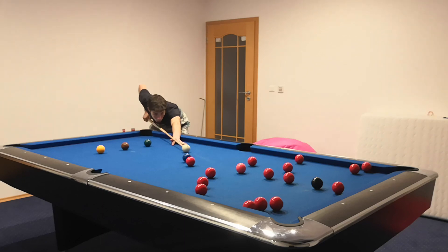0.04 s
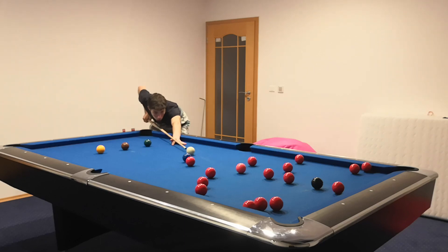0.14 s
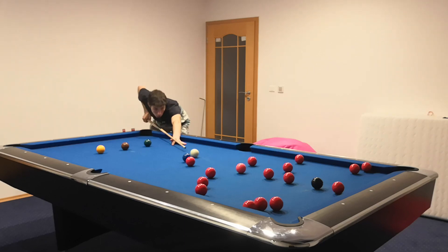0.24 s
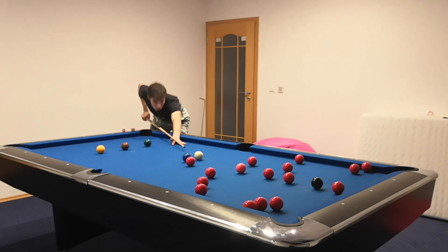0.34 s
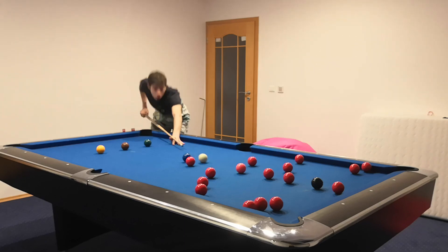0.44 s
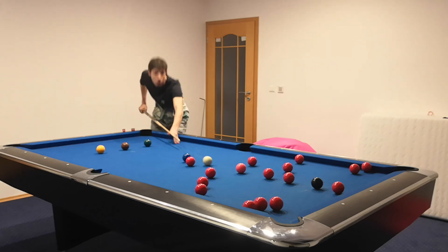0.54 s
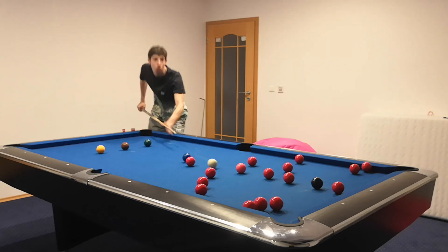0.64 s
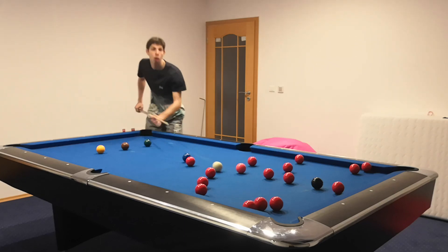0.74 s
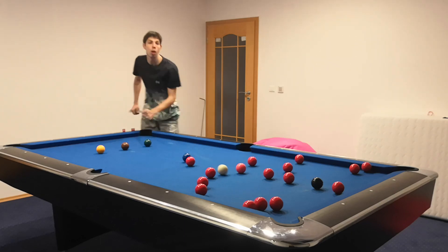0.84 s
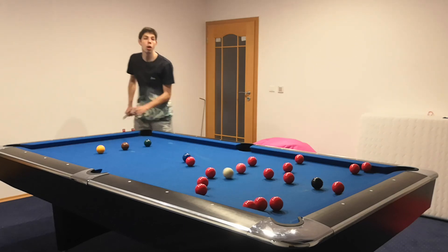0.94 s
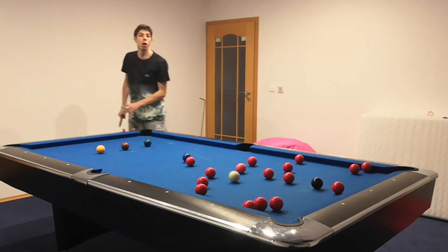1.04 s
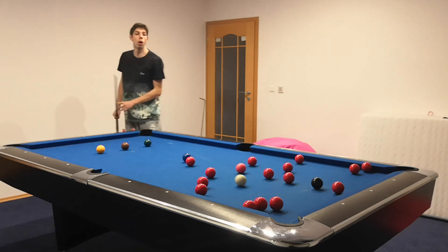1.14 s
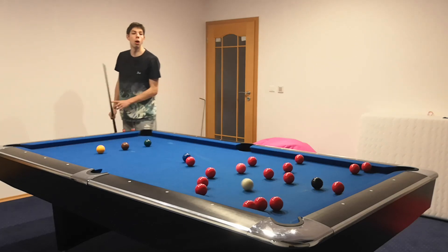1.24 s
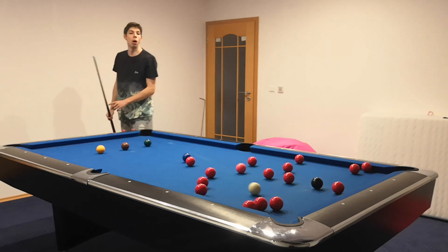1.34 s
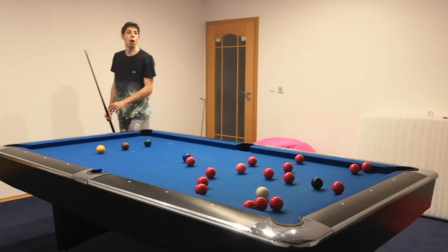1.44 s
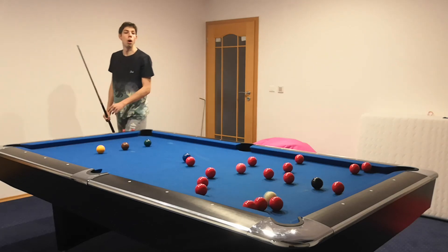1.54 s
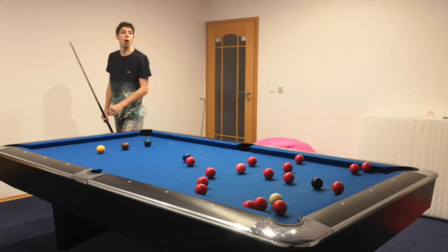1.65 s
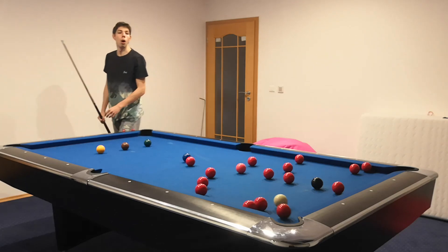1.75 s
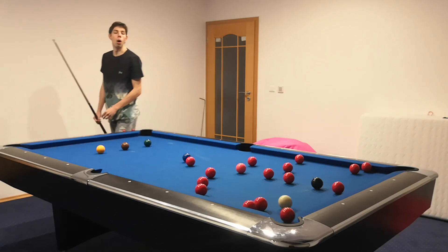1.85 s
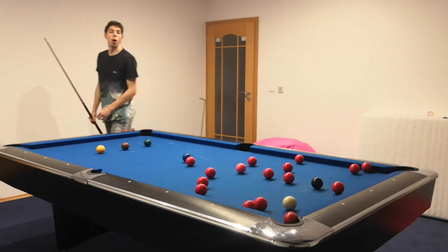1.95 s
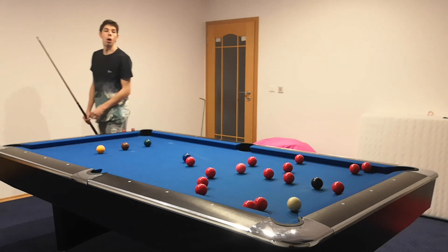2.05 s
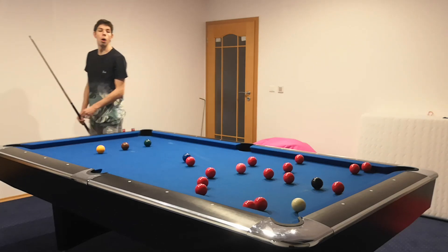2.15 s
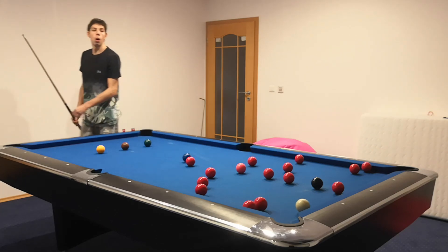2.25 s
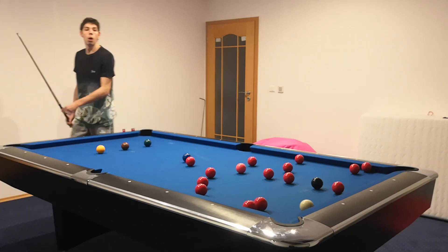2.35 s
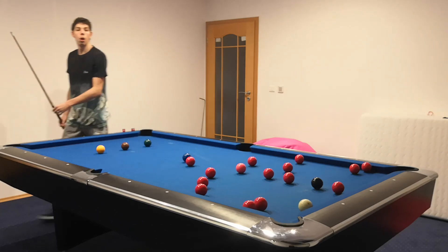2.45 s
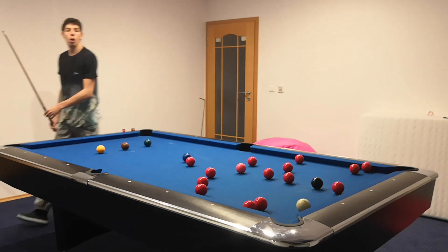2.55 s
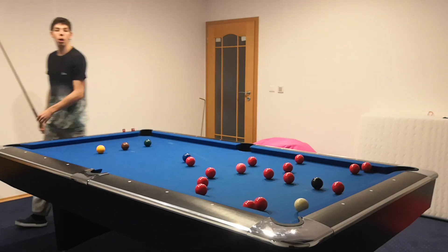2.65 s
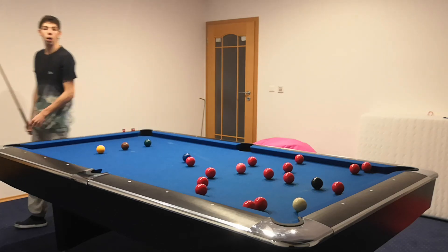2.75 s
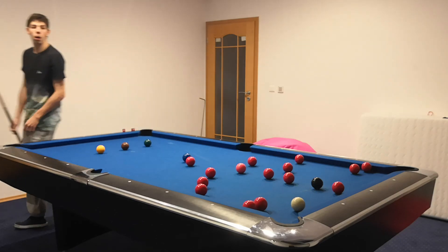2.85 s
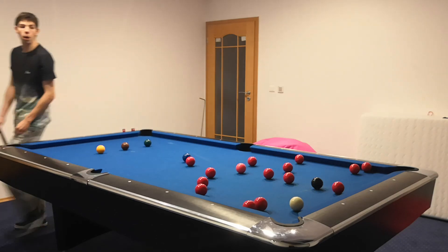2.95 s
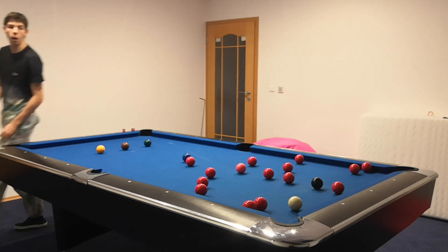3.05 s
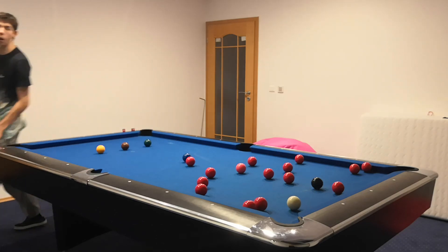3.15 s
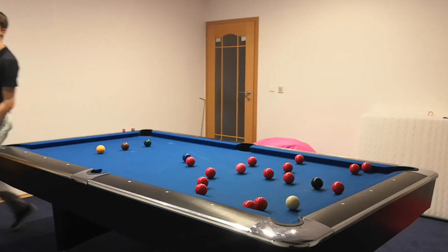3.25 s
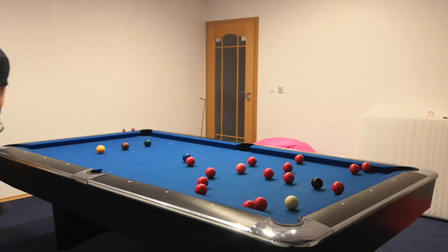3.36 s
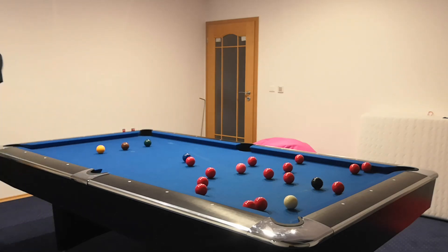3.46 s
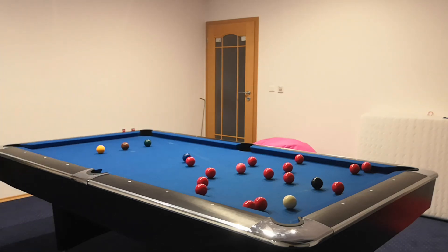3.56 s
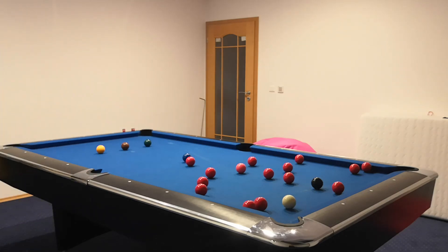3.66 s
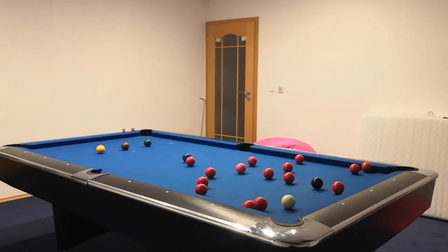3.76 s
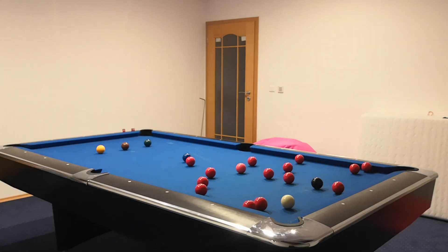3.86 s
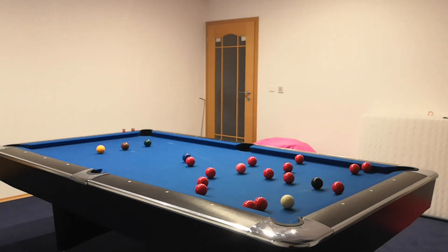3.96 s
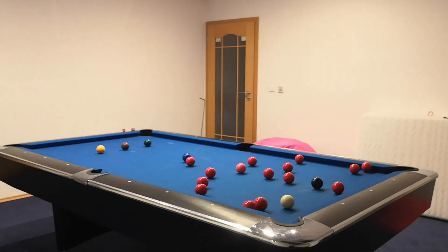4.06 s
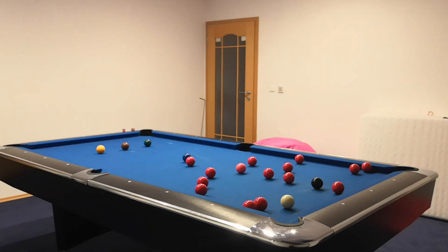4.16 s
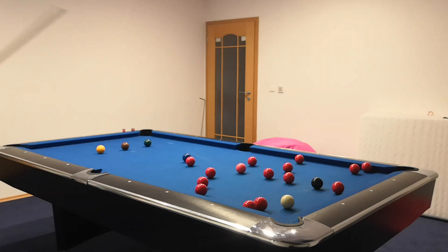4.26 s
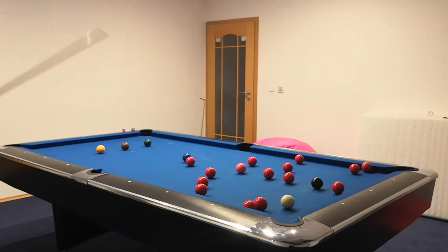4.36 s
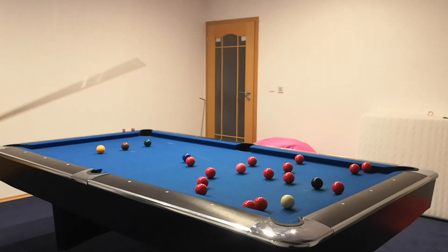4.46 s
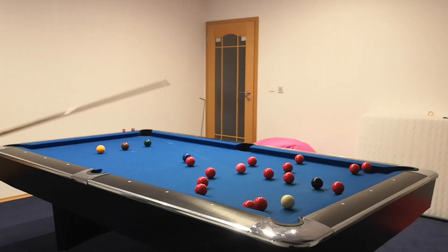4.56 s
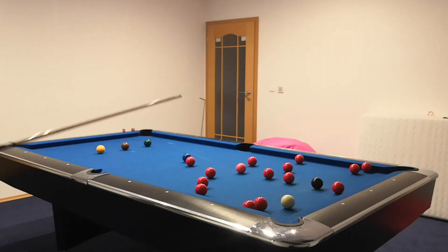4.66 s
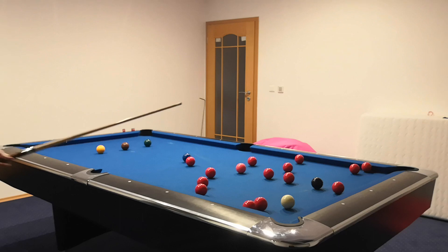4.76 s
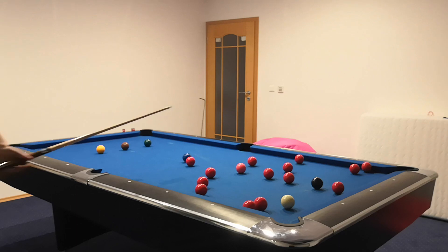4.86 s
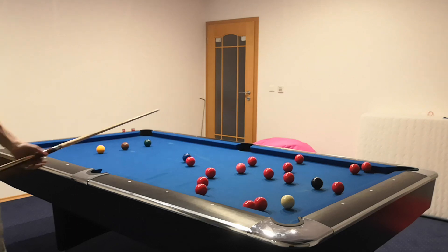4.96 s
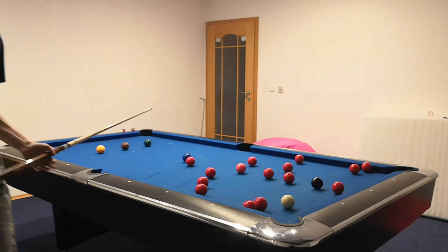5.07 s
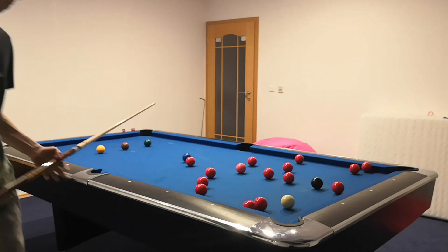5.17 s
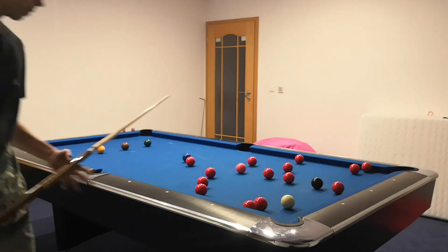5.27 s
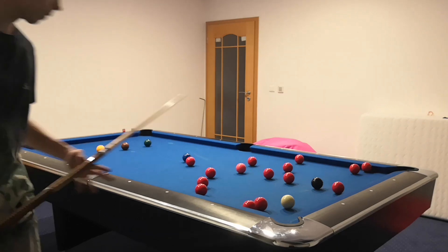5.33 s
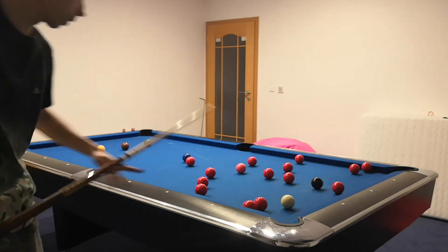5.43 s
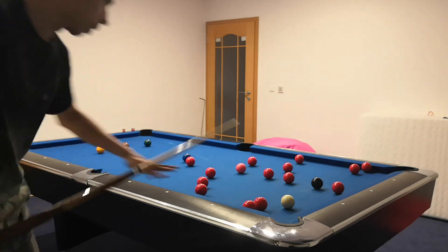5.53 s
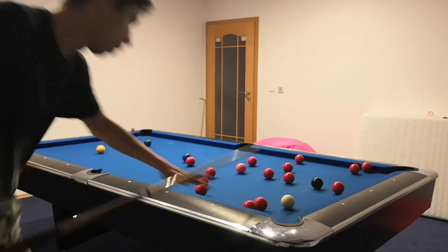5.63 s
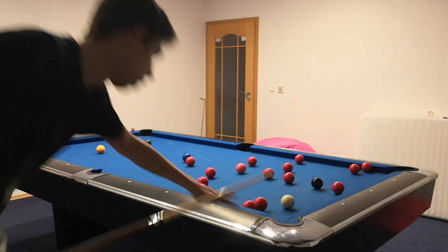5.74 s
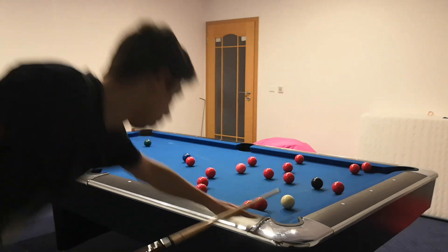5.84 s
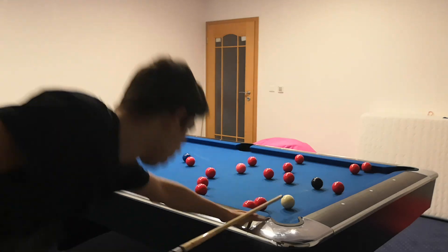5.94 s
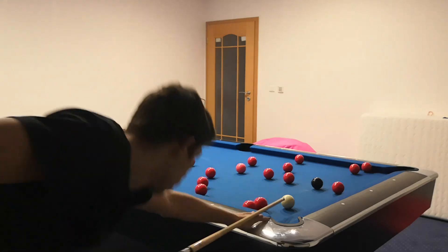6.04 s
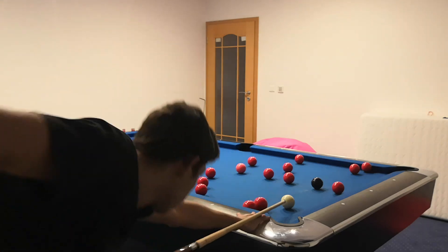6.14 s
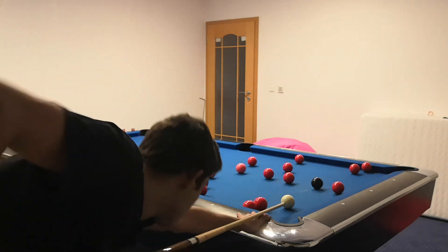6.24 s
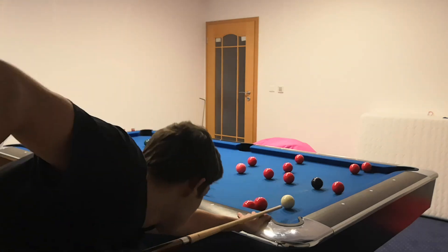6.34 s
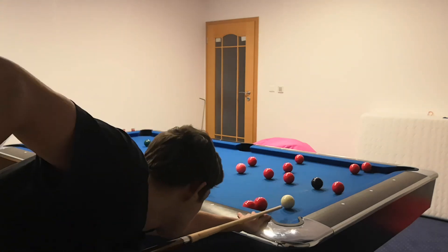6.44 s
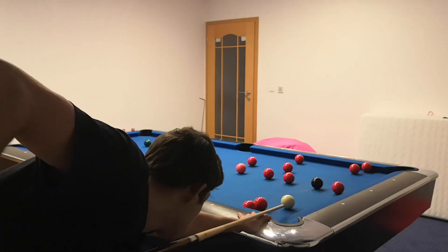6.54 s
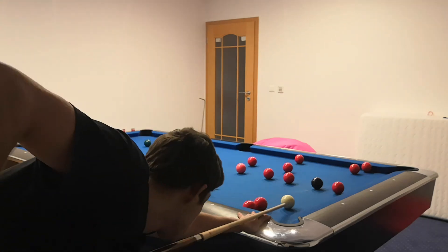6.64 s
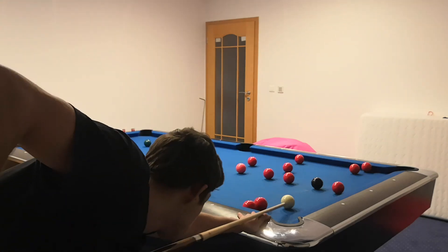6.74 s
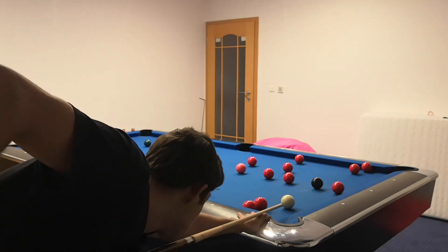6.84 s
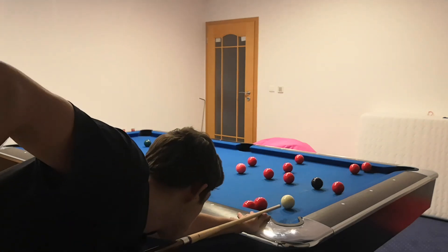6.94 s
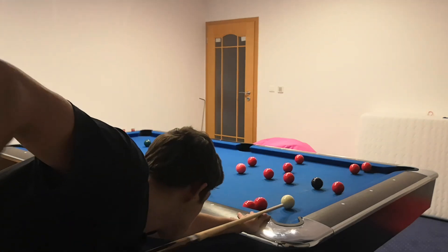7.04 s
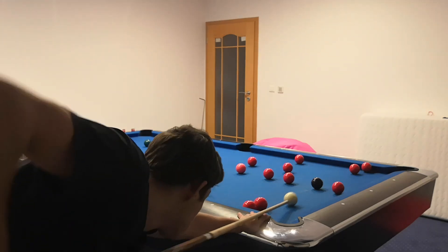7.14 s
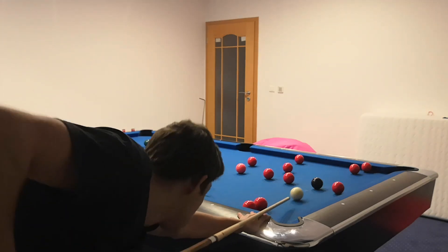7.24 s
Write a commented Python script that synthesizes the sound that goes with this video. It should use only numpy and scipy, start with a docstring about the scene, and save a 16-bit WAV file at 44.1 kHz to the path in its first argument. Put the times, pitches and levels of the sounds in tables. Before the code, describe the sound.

A cue tip clicks a ball, two balls crack loudly, one clatters into the pocket and rumbles away; soft footsteps, then another cue hit.

```python
"""A cue strikes and a ball rolls over the slate; two balls crack together, one knocks into the pocket and runs
down the return channel. The player walks round, shoes scuffing and clothes rustling; the cue strikes again at the end.
Contacts are coloured clicks with ringing modes; rolling, clothes and floor are filtered noise under level curves.
A small bare room adds echoes and a tail; a spaced microphone pair with a noise suppressor hears it."""
import sys
import numpy as np
from scipy import signal
from scipy.fft import rfft, irfft
from scipy.io import wavfile
from scipy.ndimage import uniform_filter1d

SR = 44100
rng = np.random.default_rng(int(sys.argv[2]) if len(sys.argv) > 2 else 0)


def generate_wav(signal):
    """Clip the signal to [-1, 1] and save it as 16-bit WAV at the path in sys.argv[1]."""
    frames = np.transpose(np.atleast_2d(signal))
    scaled = np.clip(frames, -1, 1) * 32767
    pcm = np.round(scaled).astype(np.int16)
    wavfile.write(sys.argv[1], SR, pcm)


N = 321930

# Source levels are relative: scene() applies the mix gains. pan_db is left minus right.
# ball against pocket and channel: time_s, body_db, thud_db, tick_db, pan_db, snap_hz, snap_width_per_hz, plate_db
POCKET_KNOCKS = [(2.056, -46, -77.5, -66, 3.5, 1200, 1, -89), (2.08, -37, -59, -39, -2.5, 2600, 1, -61),
                 (2.256, -18.5, -64, -56, -7.5, 1370, 1.61, -61),
                 (2.281, -28.5, -36, -21, -1.5, 830, 0.88, -38),
                 (2.516, -17.5, -64, -24, -1.5, 1185, 0.63, -66.5),
                 (2.57, -31, -39, -32.5, -3.5, 590, 0.35, -59.5),
                 (2.677, -24.5, -53.5, -65, -1, 1190, 1.5, -62),
                 (2.706, -37.5, -42, -63, -14, 832, 2.8, -39), (2.721, -47, -50, -29.5, -7, 510, 0.43, -60)]
# feet land: start_s, slate_db, floor_heave_db, heave_hold_s
FOOT_LANDINGS = [(.86, -74, -61, 0.041), (3.2, -73.5, -63.5, 0.13), (3.769, -56, -57, 0.099),
                 (4.29, -58, -58.5, 0.1), (4.8, -59, -54.5, 0.038), (5.3, -61, -58, 0.058),
                 (5.78, -54, -64.5, .15)]
SCUFF_DECAY_S = .0015   # grit behind a shoe or cue contact
BURST_SAMPLES = 2048   # longest contact


def cue_strikes():
    """The tip hits the ball and the shaft rings."""
    # tip on ball: time_s, body_db, thud_db, tick_db, pan_db, snap_hz, snap_width_per_hz
    tip_hits = [(.105, -32.5, -38.5, -75, 1, 643, 1.68), (.116, -40, -68, -51, -13, 2000, 1.8),
                (7.2045, -46, -81, -72, 18, 700, 2.6), (7.208, -29, -61, -76, -5.5, 900, 2.6),
                (7.212, -37, -36.5, -36, 0, 515, 1.24)]
    # cue shaft: mode_hz, level_db, t60_s
    shaft_modes = [(730, 2.5, 0.042), (1060, 9, 0.018), (1630, -4, 0.15), (2047, 0.5, 0.077),
                   (2687, -1.5, 0.23)]
    return blows(tip_hits, shaft_modes, ring_db=-24, thud_hz=264, grit_decay_s=SCUFF_DECAY_S)


def crack():
    """Hard spheres barely ring: one short minimum-phase pulse, its energy as early as its colour allows."""
    # ball on ball: time_s, level_db, pan_db
    collisions = [(1.6736, -7.5, -1.5)]
    # pulse spectrum: freq_hz, level_db_per_hz
    colour = [(120, -40), (200, -11), (244, -32.5), (277, -19), (659, -22.5), (980, -7.5), (1410, -2),
              (2290, 1), (2900, -5), (3870, -23), (4160, -39), (5260, -32), (6420, -42), (15000, -53)]
    half = BURST_SAMPLES // 2
    hz = np.fft.rfftfreq(BURST_SAMPLES, 1 / SR)
    cepstrum = irfft(np.log(amp(at_hz(colour, hz))))
    cepstrum[1:half] *= 2   # folding the cepstrum gives minimum phase
    cepstrum[half + 1:] = 0
    pulse = irfft(np.exp(rfft(cepstrum)))
    time_s, level_db, pan_db = np.transpose(collisions)
    return signal.fftconvolve(clicks(time_s, level_db, pan_db), pulse[None] / np.abs(pulse).max())[:, :N]


def pocket():
    """The ball knocks the wooden frame, which rings."""
    # table frame: mode_hz, level_db, t60_s
    frame_modes = [(316, -30, 0.018), (487, 0.5, 0.1), (629.5, 4, 0.033), (1033, 4, 0.04),
                   (1178, -3.5, 0.069), (1266, 0.5, 0.068), (1945, 3, 0.019), (2765, -11, 0.075)]
    return blows(POCKET_KNOCKS, frame_modes, ring_db=-18, thud_hz=79, grit_decay_s=.0032)


def plate():
    """Each knock jars the metal plate of the pocket, which rings."""
    # metal pocket plate: mode_hz, level_db, t60_s
    metal_modes = [(8500, -4, .05), (9200, -14, .03), (3850, -3, .03)]
    time_s, *_, plate_db = np.transpose(POCKET_KNOCKS)
    return ringing(time_s, plate_db, 0 * time_s, metal_modes)


def hollow_knocks():
    """Soft taps on hollow wood: only a short round ring is heard."""
    # time_s, level_db, centre_hz
    taps = [(2.064, -43.5, 540), (2.115, -56, 580), (3.488, -50.5, 404), (3.526, -61.5, 420),
            (3.729, -57.5, 418), (3.825, -64.5, 420)]
    time_s, level_db, hz = np.transpose(taps)
    return bursts(time_s, level_db, 0, hz, 0.2, grit_decay_s=.0014)


def rolling():
    """Rolling noise, blows and feet excite the low resonances of the slate; drone and channel join in."""
    # slate resonances: centre_hz, width_hz, level_db
    slate_modes = [(82, 27.2, 0.5), (119, 20, -6), (149, 11, -12.5), (213, 3, -16)]
    white = stereo_noise([(20, -1), (300, -4.5), (2000, -59.5)])
    slate = 0
    for hz, width_hz, level_db in slate_modes:
        slate = slate + amp(level_db) * resonance(resonance(white, hz, width_hz), hz, 4.6 * width_hz)
    return slate_gain() * rms_one(slate) + cue_ball_drone(white) + channel_rattle()


def slate_gain():
    """Gain of the slate: the powers of rolling, jolts, feet and channel add."""
    # balls rolling on the cloth: time_s, level_db
    roll_curve = [(0.0, -58), (0.36, -60), (0.55, -66), (1.6, -67), (2.0, -66), (3.1, -68.5), (6.1, -77),
                  (7.3, -70)]
    # blows that shake the slate: start_s, level_db
    jolt_rows = [(.105, -48), (1.674, -47.5), (2.1, -58), (2.256, -33.5), (7.208, -42.5)]
    jolts = swells(*np.transpose(jolt_rows), rise_s=.1, hold_s=0, fall_db_per_s=109)
    start_s, slate_db, *_ = np.transpose(FOOT_LANDINGS)
    feet = swells(start_s, slate_db, rise_s=.031, hold_s=.052, fall_db_per_s=91)
    roll = amp(in_time(roll_curve)[0])
    return np.sqrt(roll ** 2 + jolts ** 2 + feet ** 2 + channel_gain(column=1) ** 2)


def cue_ball_drone(white):
    """The cue ball rolls the length of the slate: noise through a narrow 85 Hz resonance."""
    # time_s, level_db
    drone_curve = [(.3, -81), (.56, -81), (.66, -57), (1.1, -57), (1.3, -59), (1.6, -64.5), (1.7, -70)]
    hum = resonance(resonance(white, 85, 6), 85, 14)
    return amp(once(drone_curve)[0]) * rms_one(hum)


def channel_rattle():
    """The ball runs roughly down the return channel: coloured noise with a flickering level."""
    # freq_hz, level_db_per_hz
    colour = [(88, -41), (150, -15), (381, -3), (462, -0.5), (769, -8), (1090, -1.5), (1350, -6),
              (4870, -22), (6330, -32), (8690, -30), (10000, -35), (13000, -73), (22000, -120)]
    return channel_gain(column=3) * flicker(40, 2.0) * stereo_noise(colour)


def channel_gain(column):
    """Gain from one level column of the run down the channel."""
    # time_s, slate_db, floor_heave_db, rattle_db
    channel_run = [(2.29, -31, -55, -32.5), (2.4, -51, -50, -45), (2.5, -41, -56, -46),
                   (2.6, -40, -58, -54), (2.7, -40, -49, -38), (2.8, -37.5, -58, -43.5),
                   (2.88, -46, -62, -59), (2.95, -53, -75, -78), (3.098, -71.5, -60, -100)]
    return amp(once([(row[0], row[column]) for row in channel_run])[0])


def shoes():
    """Shoe contacts share the relative level of their thud and the relative width of their snap."""
    # shoes and cue handling: time_s, body_db, tick_db, pan_db, snap_hz
    contacts = [(3.066, -52, -66, 1, 1220), (3.775, -39.5, -51, 3, 1519), (3.894, -34.5, -55, -1, 910),
                (4.055, -47.5, -85, 2, 810), (4.286, -62, -72, 0, 1180), (4.31, -53, -85, 1, 414),
                (4.399, -50.5, -85, -1.5, 417), (4.385, -42.5, -39.5, -5, 1980), (4.479, -62, -57, 1, 2670),
                (4.563, -50.5, -73, 1.5, 1270), (4.825, -47, -48, -10, 2020), (4.867, -48.5, -61, 2, 1160),
                (4.957, -38, -38, 0, 860), (5.08, -44, -51, 1, 1530), (5.183, -45, -54, -3.5, 2090),
                (5.343, -52, -37, -6.5, 1110), (5.348, -55, -48, -4.5, 1060), (5.455, -48, -62, -1, 1340),
                (5.607, -48.5, -74, -2, 1120), (5.818, -49.5, -44.5, -3, 1740),
                (5.87, -45.5, -68, 7.5, 1020), (5.927, -41, -64, -6.5, 1870)]
    # soles: mode_hz, level_db, t60_s
    sole_modes = [(1015, 8.5, 0.19), (1284, 9.5, 0.056)]
    thud_under_body_db, snap_width_per_hz = -22.5, 1
    rows = [(time_s, body_db, body_db + thud_under_body_db, tick_db, pan_db, snap_hz, snap_width_per_hz)
            for time_s, body_db, tick_db, pan_db, snap_hz in contacts]
    return blows(rows, sole_modes, ring_db=-33.5, thud_hz=69.4, grit_decay_s=SCUFF_DECAY_S)


def clothes():
    """Cloth swishes and hisses: two flickering noises that swell with each movement."""
    # swish spectrum: freq_hz, level_db_per_hz
    swish_colour = [(150, -31), (250, -20), (262, -15.5), (382, -7.5), (642, -14.5), (1050, -5.5),
                    (1440, -9), (1910, -6), (4500, -15), (5850, -36.5), (9900, -120)]
    # hiss spectrum: freq_hz, level_db_per_hz
    hiss_colour = [(1760, -34), (3000, -22), (4640, -7), (5980, -1), (7200, -5.5), (9240, -7), (12000, -39),
                   (15600, -50.5), (22000, -120)]
    swish = rustle(still_db=-76.5, column=2) * flicker(20, 2.0) * stereo_noise(swish_colour)
    hiss = rustle(still_db=-82.5, column=3) * flicker(27, 2.9) * stereo_noise(hiss_colour)
    return swish + hiss


def rustle(still_db, column):
    """Gain of the clothes: a swell for every movement over a faint steady rustle."""
    # movements of the player: start_s, length_s, swish_db, hiss_db
    moves = [(0.403, 0.43, -77, -81), (0.835, 0.11, -67.5, -76.5), (1.127, 0.22, -71.5, -76.5),
             (3.043, 0.36, -69, -81.5), (3.745, 0.068, -60.5, -71.5), (3.882, 0.042, -66.5, -68),
             (4.189, 0.27, -64, -70), (4.802, 0.071, -55, -69.5), (4.952, 0.015, -55, -60.5),
             (5.063, 0.14, -62, -75), (5.255, 0.17, -61.5, -68), (5.762, 0.26, -61.5, -72)]
    columns = np.transpose(moves)
    start_s, length_s = columns[:2]
    rise_share = .4
    swell = swells(start_s, columns[column], rise_share * length_s, (1 - rise_share) * length_s, fall_db_per_s=109.5)
    return amp(still_db) + swell


def squeak():
    """A hand slides along the rail: narrow noise riding on a wavering pitch."""
    # time_s, pitch_hz, level_db
    slide = [(5.914, 1855, -80), (5.93, 1880, -53), (5.982, 1912, -62.5), (6.314, 1870, -73),
             (6.36, 1853, -89)]
    pitch_hz, level_db = once(slide)
    grain = rms_one(band(rng.standard_normal((2, N)), 15, 160))
    return amp(level_db) * grain * np.sin(2 * np.pi * np.cumsum(pitch_hz) / SR)


def floor_heave():
    """The floor heaves under each step and during the channel run: very low noise."""
    start_s, _, heave_db, hold_s = np.transpose(FOOT_LANDINGS)
    feet = swells(start_s, heave_db, rise_s=.057, hold_s=hold_s, fall_db_per_s=100)
    gain = amp(-84) + feet + channel_gain(column=2)
    return gain * stereo_noise([(15, -25.0), (25, 4), (45, 1.0), (80, -25.5), (400, -67)])


def room_tone():
    """Steady coloured noise of the room and the electronics."""
    # freq_hz, level_db_per_hz
    tone_colour = [(15, -43.5), (25, -8), (48, -18.5), (82, -11), (227, -8), (274, -13.5), (508, -18.5),
                   (1370, -18.5), (1530, -14.5), (1950, -14), (2110, -17), (2690, -18), (8560, -30.5),
                   (15500, -30)]
    return amp(-73) * stereo_noise(tone_colour)


def blows(rows, modes, ring_db, thud_hz, grit_decay_s):
    """A blow is a low thud, a snap with the ring of the body, and a bright tick."""
    time_s, body_db, thud_db, tick_db, pan_db, snap_hz, snap_width_per_hz = np.transpose(rows)[:7]
    thud = bursts(time_s, thud_db, 0, thud_hz, 1.29, grit_decay_s=.00033)
    snap = bursts(time_s, body_db, pan_db, snap_hz, snap_width_per_hz, grit_decay_s)
    tick = bursts(time_s, tick_db, pan_db, 6000, 1.6, grit_decay_s / 6)
    return thud + snap + tick + ringing(time_s, body_db + ring_db, pan_db, modes)


def bursts(times_s, levels_db, pans_db, centres_hz, widths_per_hz, grit_decay_s):
    """A contact is a click with a little dying grit behind it, coloured by what touches."""
    out = np.zeros((2, N + BURST_SAMPLES))
    decay = np.exp(-np.arange(BURST_SAMPLES) / (grit_decay_s * SR))
    for time_s, level_db, pan_db, hz, width in np.broadcast(times_s, levels_db, pans_db, centres_hz, widths_per_hz):
        grit = .05 * rng.standard_normal(BURST_SAMPLES) * decay
        grit[0] = 1
        grit = resonance(resonance(grit, hz, width * hz), hz, 2 * width * hz)
        gains = amp(level_db + np.array([.5, -.5]) * pan_db)
        start = round(time_s * SR)
        out[:, start:start + BURST_SAMPLES] += np.outer(gains, grit / np.abs(grit).max())
    return out[:, :N]


def ringing(times_s, level_db, pan_db, modes):
    """Decaying sines: every blow strikes every mode with a random strength of its own."""
    out = 0
    luck_db = rng.normal(0, 2.5, (len(times_s), len(modes)))
    for k, (hz, mode_db, t60_s) in enumerate(modes):
        r, w = amp(-60 / (t60_s * SR)), 2 * np.pi * hz / SR
        strikes = clicks(times_s, level_db + mode_db + luck_db[:, k], pan_db)
        out = out + signal.lfilter([0, np.sin(w)], [1, -2 * r * np.cos(w), r * r], strikes)
    return out


def clicks(times_s, level_db, pan_db):
    """A stereo train of single-sample clicks."""
    out = np.full((2, N), 1e-18)   # not zero, so that filters stay out of denormals
    out[:, np.round(np.asarray(times_s) * SR).astype(int)] = amp(level_db + np.outer([.5, -.5], pan_db))
    return out


def swells(starts_s, level_db, rise_s, hold_s, fall_db_per_s):
    """Gain of overlapping swells: each starts 14 dB down, rises, holds and falls; powers add."""
    grid = np.arange(0, N, 32)
    t = grid[:, None] / SR - starts_s
    rise_db = 14 * np.minimum(t / rise_s - 1, 0)
    fall_db = fall_db_per_s * np.maximum(t - rise_s - hold_s, 0)
    power = amp(level_db + rise_db - fall_db) ** 2 * (t > 0)
    return np.interp(np.arange(N), grid, np.sqrt(np.sum(power, axis=1)))


def flicker(rate_hz, spread_db):
    """Gain that wanders by chance: low-passed noise, in dB."""
    r = np.exp(-2 * np.pi * rate_hz / SR)
    wander = signal.lfilter([1], [1, -2 * r, r * r], rng.standard_normal(N + SR))[SR:]
    return amp(spread_db * rms_one(wander))


def stereo_noise(spectrum, size=N):
    """Coloured noise, alike in both channels chiefly in the bass; rms 1."""
    # freq_hz, left_right_correlation
    likeness = [(60, 0.9), (125, 0.46), (250, .8), (500, 0.18), (1000, 0.16), (10000, 0.025)]
    hz = np.fft.rfftfreq(size, 1 / SR)
    mid, side = rfft(rng.standard_normal((2, size)))
    alike = at_hz(likeness, hz)
    pair = np.sqrt(1 + alike) * mid + np.sqrt(1 - alike) * side * np.array([[1], [-1]])
    return rms_one(irfft(pair * amp(at_hz(spectrum, hz)), size))


def resonance(x, hz, width_hz):
    """One two-pole resonance, gain 1 on top."""
    r = np.exp(-np.pi * width_hz / SR)
    return (1 - r * r) / 2 * signal.lfilter([1, 0, -1], [1, -2 * r * np.cos(2 * np.pi * hz / SR), r * r], x)


def band(x, low_hz, high_hz):
    """Band-pass."""
    return signal.sosfilt(signal.butter(2, [low_hz, high_hz], "band", fs=SR, output="sos"), x)


def in_time(rows):
    """Columns of a curve at every sample."""
    time_s, *columns = np.transpose(rows)
    return [np.interp(np.arange(N) / SR, time_s, column) for column in columns]


def once(rows):
    """Columns of a curve whose last one, a level, drops to -120 dB outside its span."""
    (start_s, *first), (end_s, *last) = rows[0], rows[-1]
    return in_time([(start_s - .01, *first[:-1], -120), *rows, (end_s + .05, *last[:-1], -120)])


def at_hz(points, hz):
    """A spectrum read on a log-frequency axis."""
    points_hz, values = np.array(points).T
    return np.interp(np.log(np.maximum(hz, 1)), np.log(points_hz), values)


def amp(db):
    """dB to gain."""
    return 10 ** (np.asarray(db) / 20)


def rms_one(x):
    """Scale to rms 1."""
    return x / np.sqrt(np.mean(x ** 2) + 1e-20)


def room(x, tail_db):
    """Direct sound, near echoes off table and walls, then a dense tail that dies band by band."""
    # freq_hz, t60_s
    decay_times = [(60, 0.677), (200, 0.46), (600, 0.63), (1500, 0.4), (4000, 0.51), (10000, 0.28)]
    # delay_ms, left_db, right_db
    echoes = [(2.2, -2, -3), (3.4, 2, 0), (5.0, -5, -5), (7.2, -7, -2), (10.2, -6, -7), (21, -7, -10),
              (31, -10, -6)]
    t = np.arange(SR) / SR
    noise = [stereo_noise([(20, 0), (20000, 0)], size=SR) for _ in range(2)]
    tail = 0
    for k, low_hz in enumerate(30 * 2.0 ** np.arange(9)):   # octaves; neighbours get unrelated noise
        t60_s = at_hz(decay_times, np.sqrt(2) * low_hz)
        tail = tail + band(noise[k % 2], low_hz, 2 * low_hz) * amp(-60 * t / t60_s)
    response = amp(tail_db) * tail * (1 - np.exp(-t / 0.002))
    response[:, 0] += 1
    for delay_ms, left_db, right_db in echoes:
        response[:, round(delay_ms * SR / 1000)] += amp([left_db, right_db])
    return signal.fftconvolve(x, response, axes=1)[:, :N]


def scene():
    """Each source has a tail level of its own; what is close to the microphones is heard drier."""
    # close sound added as the player nears the microphones: time_s, level_db
    nearness = [(0.0, -14), (3.0, 1), (4.9, -20), (5.15, 9.5), (5.5, 1), (6.0, -17.5), (7.3, -3.5)]
    cue, balls, knocks = cue_strikes(), crack(), pocket()
    steps = shoes() + hollow_knocks()
    struck = room(amp(-2.5) * balls, -19.5) + room(cue, -16.5)
    struck = struck + room(amp(-3) * knocks, -17.5) + room(amp(-4.5) * steps, -17.5)
    close = amp(in_time(nearness)[0]) * (steps + cue)
    close = close + amp(-9) * balls + amp(-14.5) * knocks + amp(5.5) * plate()
    player = clothes() + floor_heave() + squeak()
    return struck + room(close, -34) + amp(4) * (rolling() + player)


def suppress(x, max_cut_db, span_db):
    """Quiet parts of the spectrum are turned down, the more the further they lie under the threshold."""
    # threshold: freq_hz, level_db_per_bin
    quiet_limit = [(60, -55), (300, -60), (1000, -82.5), (3000, -66), (10000, -90.5)]
    hz, _, spec = signal.stft(x, SR, nperseg=512)
    power = np.mean(np.abs(spec) ** 2, axis=0)
    power = uniform_filter1d(uniform_filter1d(power, size=5, axis=0), size=5, axis=1)
    over_db = 10 * np.log10(np.abs(power) + 1e-20) - at_hz(quiet_limit, hz)[:, None]
    cut_db = max_cut_db / (1 + np.exp(np.clip(over_db / span_db, -30, 30)) / 3)
    return signal.istft(spec * amp(-cut_db), SR, nperseg=512)[1][:, :N]


def record(dry):
    """Long waves reach both ports alike, the capsules fade near 10 kHz; overload, suppressor, lag, top cut."""
    left_lag_samples, overload_level = 17, .8
    mid, side = (dry[0] + dry[1]) / 2, (dry[0] - dry[1]) / 2
    side = signal.sosfilt(signal.butter(2, 300, "high", fs=SR, output="sos"), side)
    pair = np.array([mid + side, mid - side])
    capsules = signal.sosfilt(signal.butter(4, 9800, fs=SR, output="sos"), pair)
    rounded = overload_level * np.tanh(capsules / overload_level)   # the preamplifier rounds peaks
    heard = suppress(rounded, max_cut_db=5.5, span_db=6.0) + room_tone()
    heard[0] = np.r_[heard[0, :left_lag_samples][::-1], heard[0, :-left_lag_samples]]   # left trails
    return signal.sosfilt(signal.cheby2(12, 70, 16300, fs=SR, output="sos"), heard)   # 70 dB down from 16.3 kHz


dry = scene()
out = record(dry)
generate_wav(out)
```